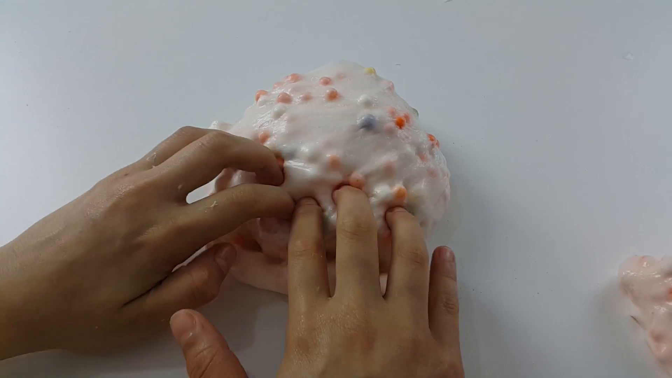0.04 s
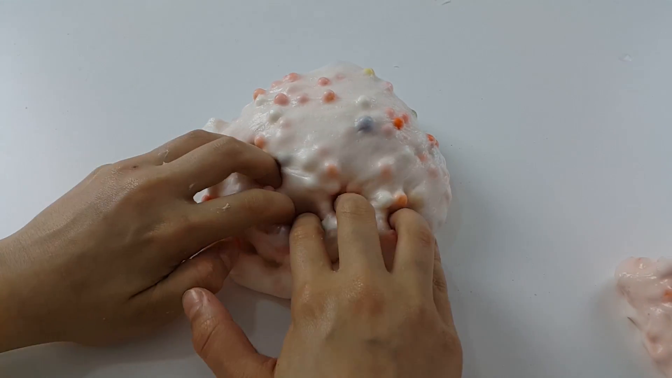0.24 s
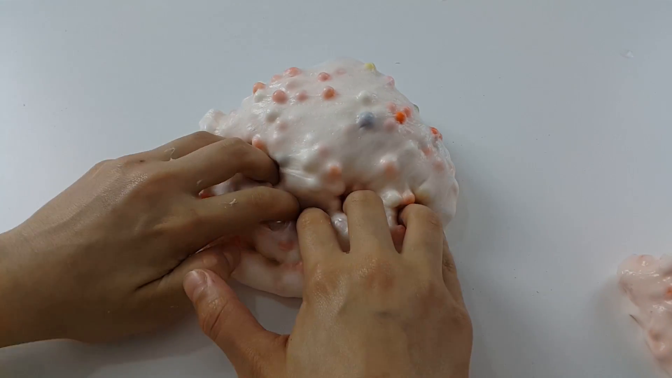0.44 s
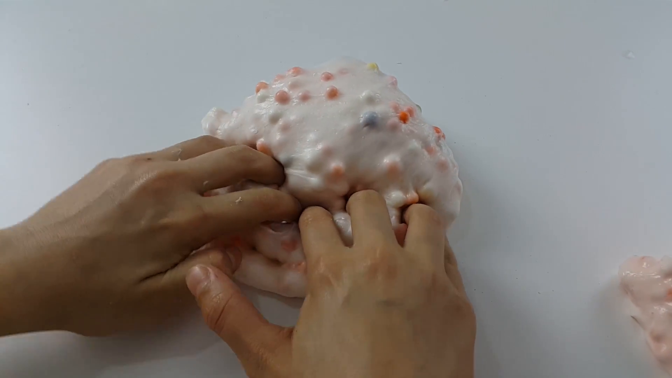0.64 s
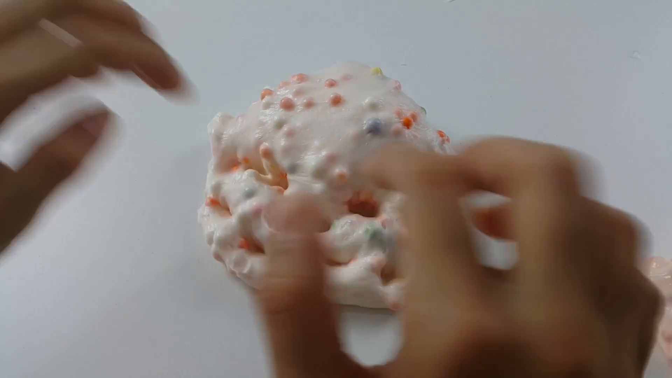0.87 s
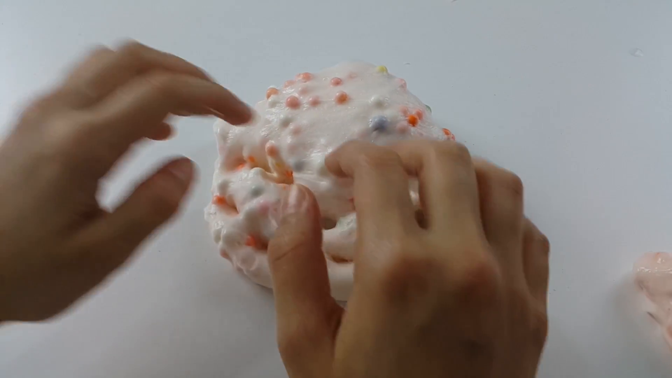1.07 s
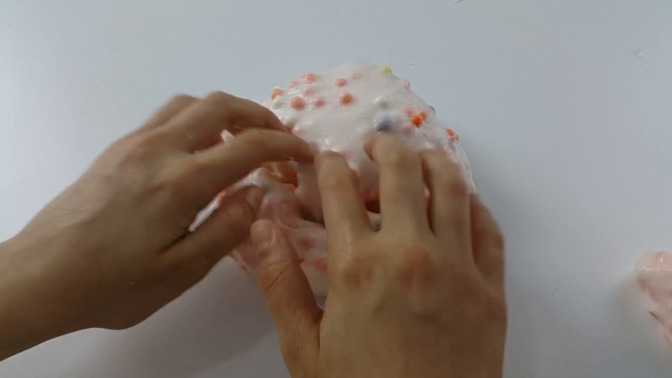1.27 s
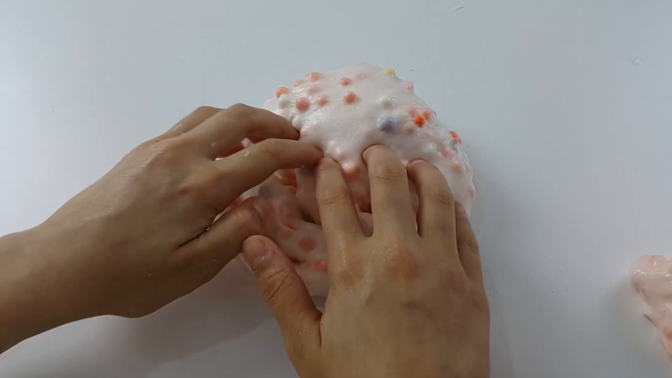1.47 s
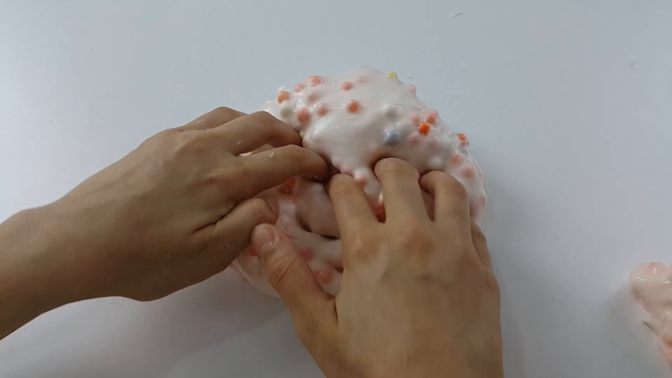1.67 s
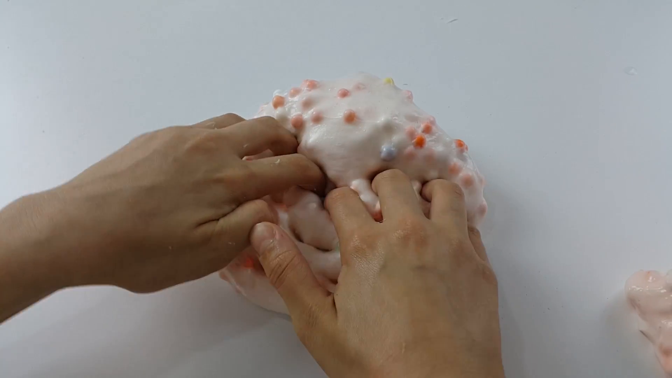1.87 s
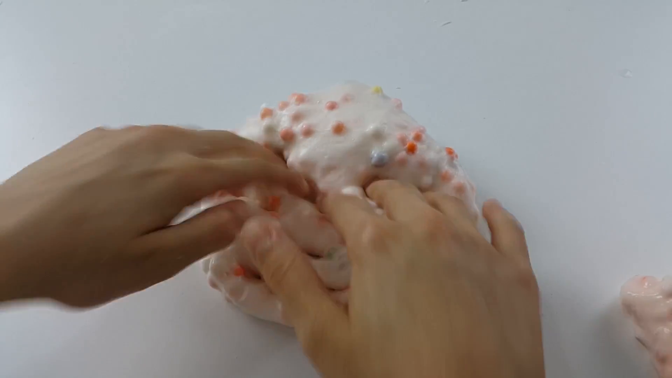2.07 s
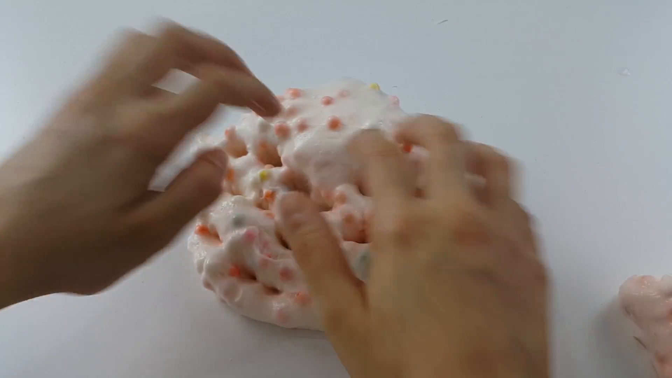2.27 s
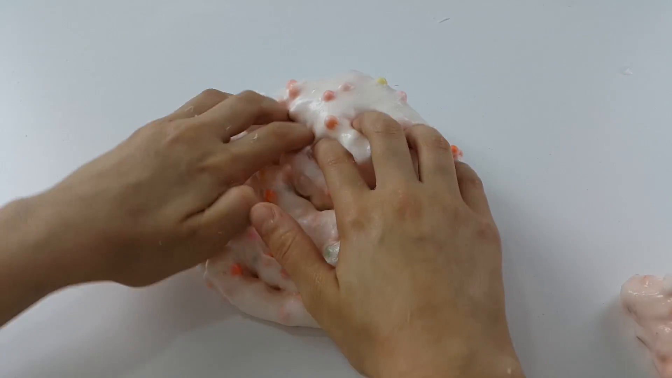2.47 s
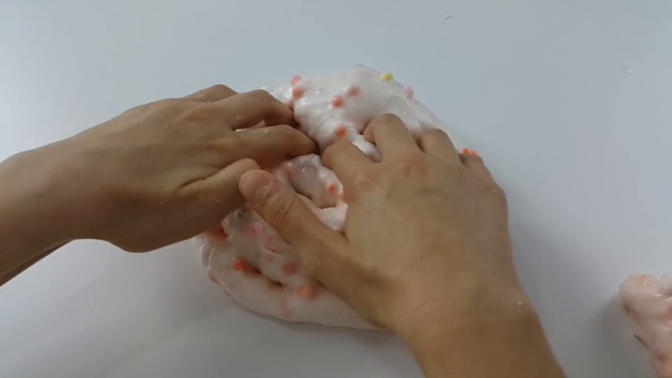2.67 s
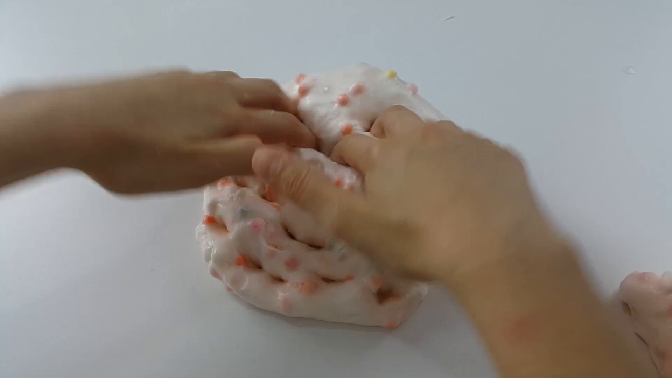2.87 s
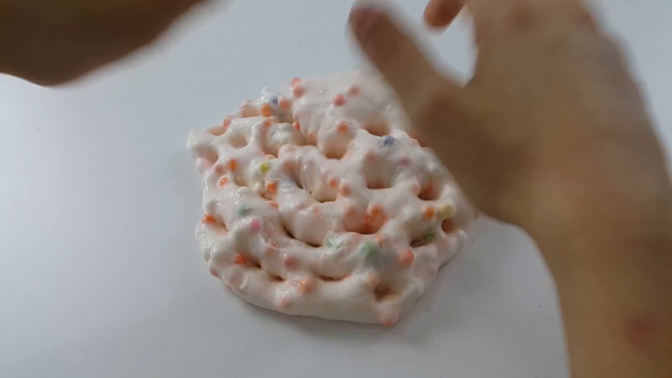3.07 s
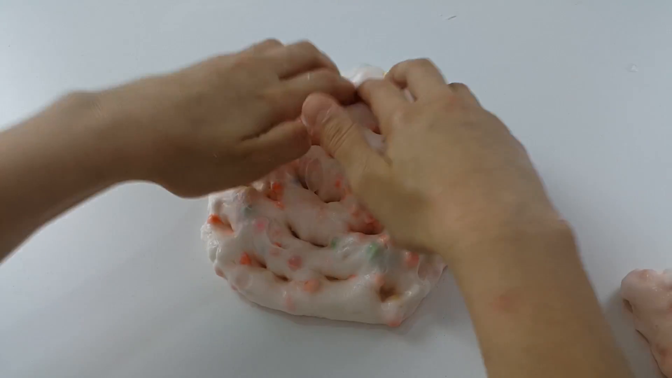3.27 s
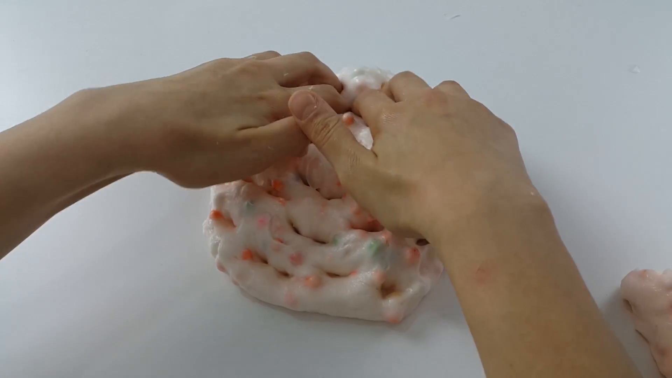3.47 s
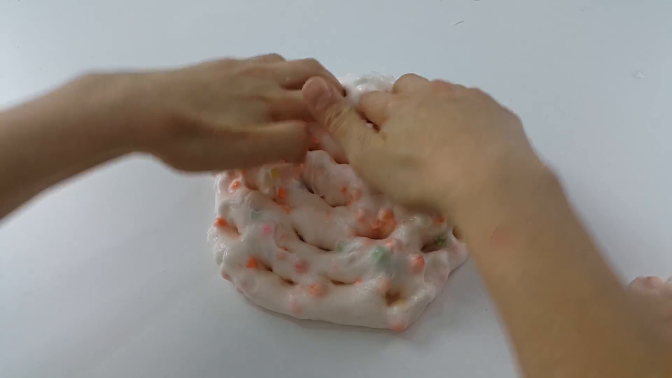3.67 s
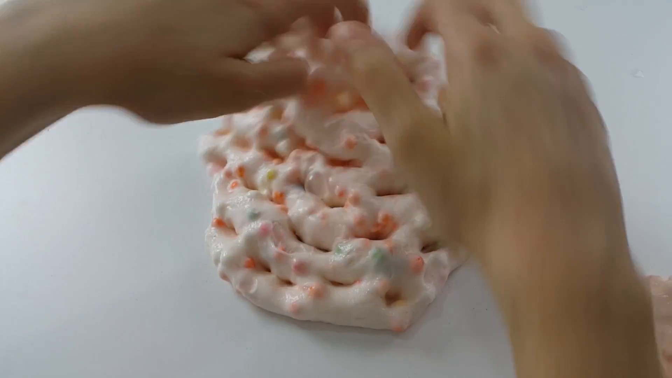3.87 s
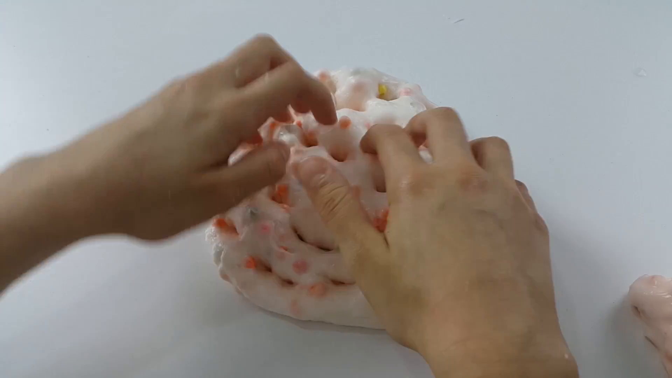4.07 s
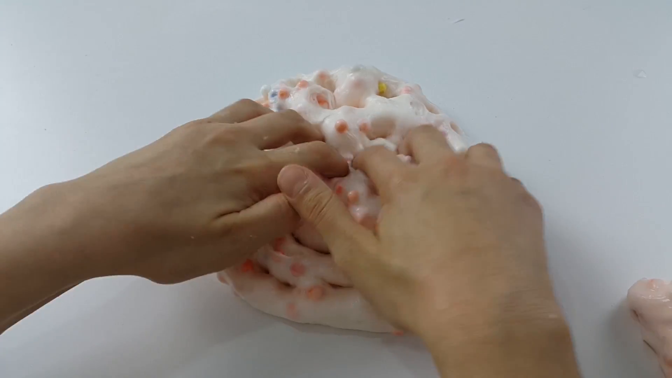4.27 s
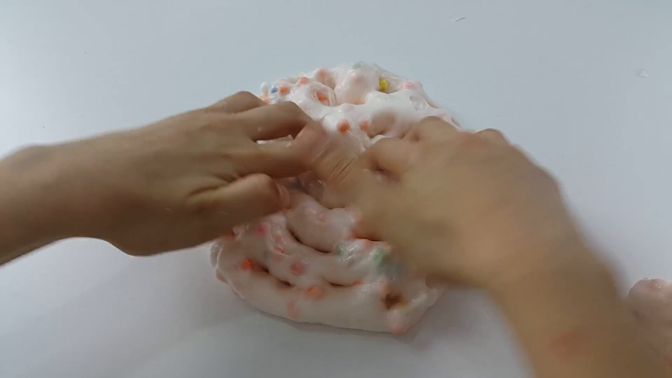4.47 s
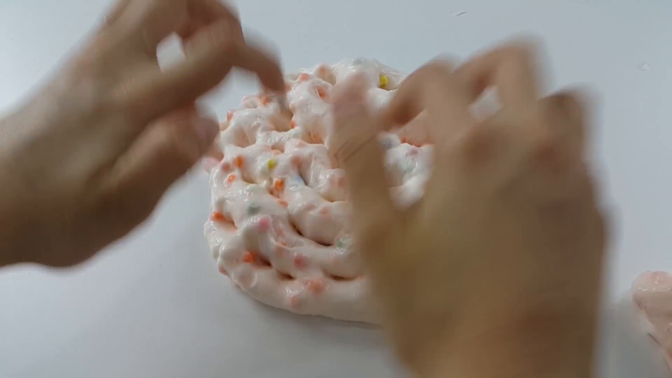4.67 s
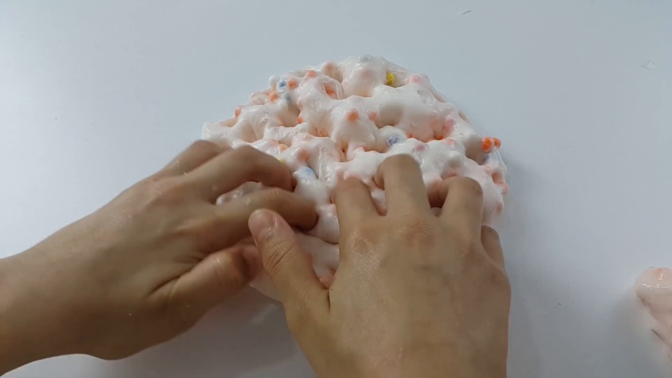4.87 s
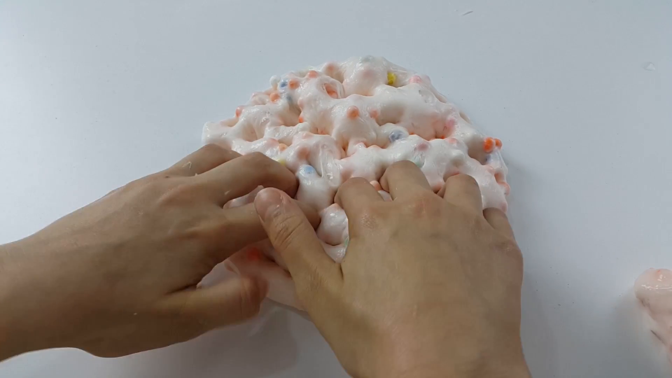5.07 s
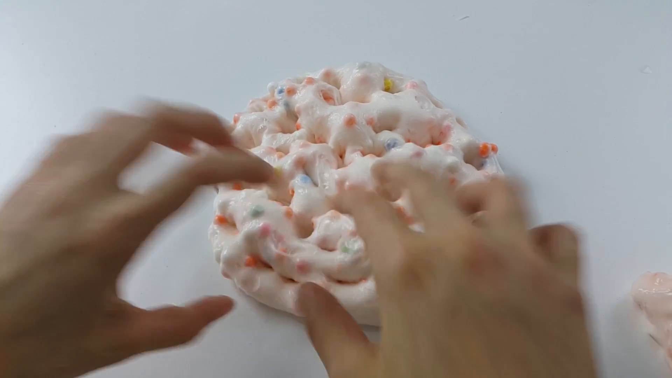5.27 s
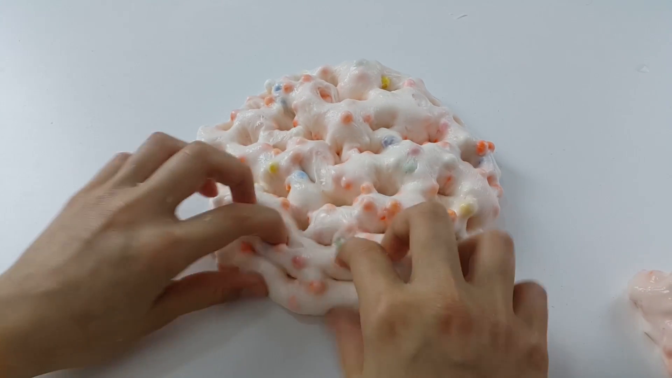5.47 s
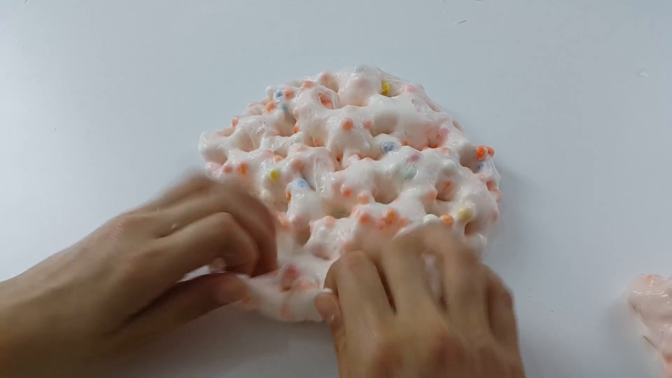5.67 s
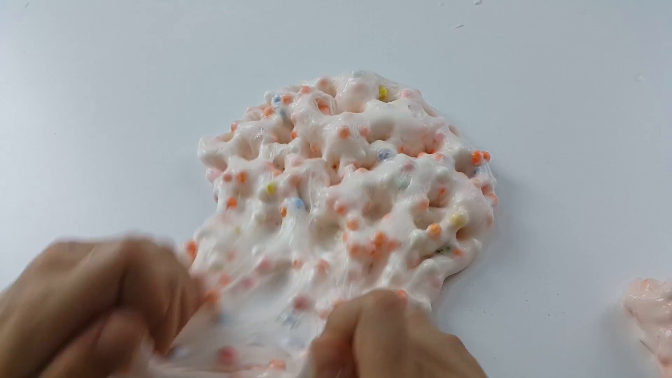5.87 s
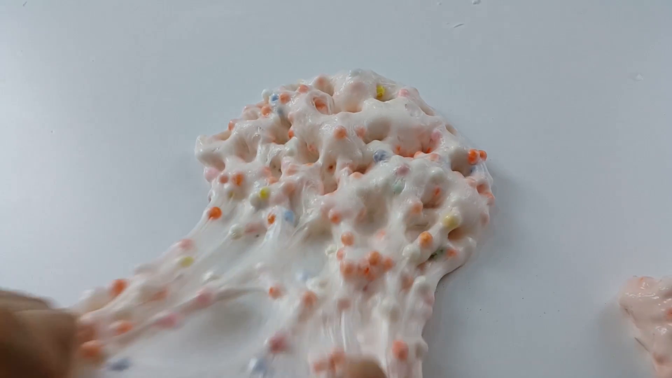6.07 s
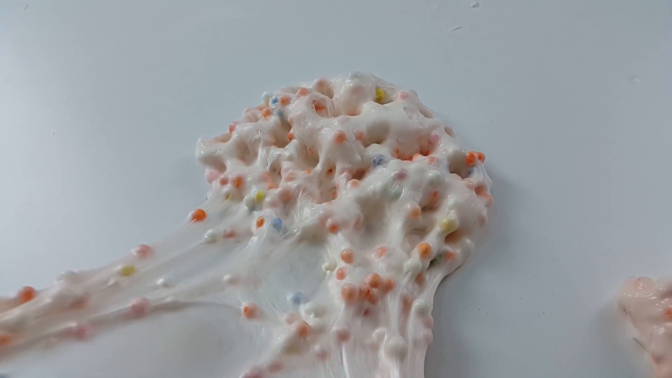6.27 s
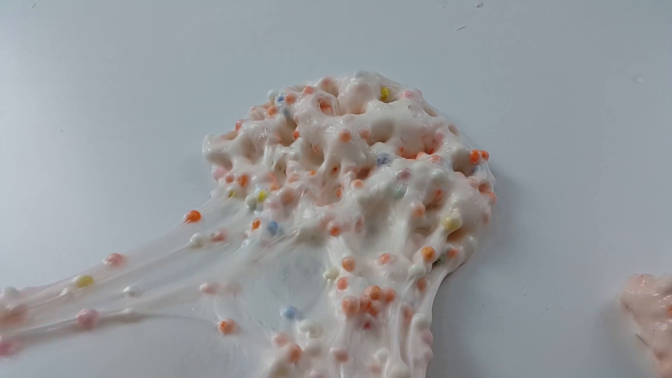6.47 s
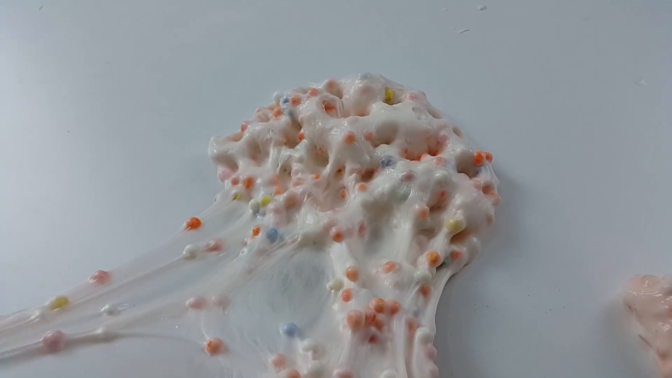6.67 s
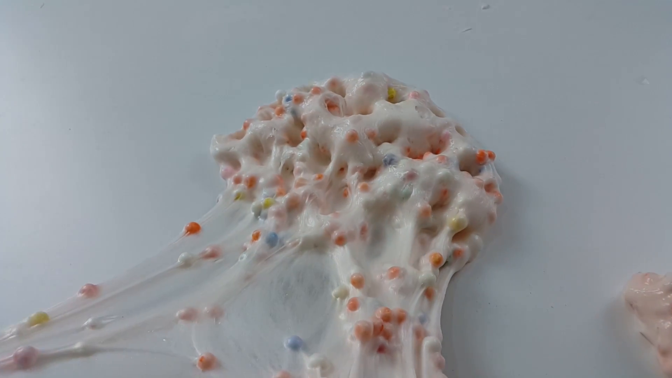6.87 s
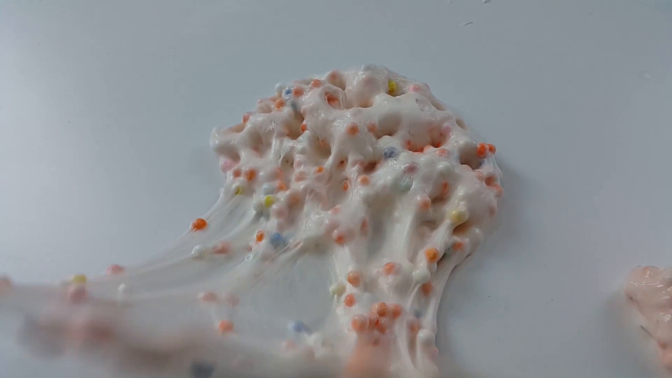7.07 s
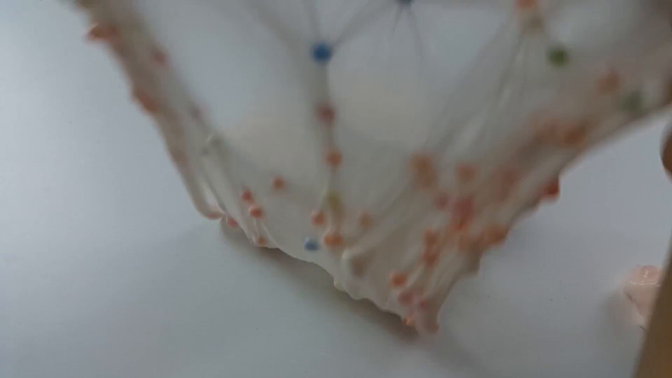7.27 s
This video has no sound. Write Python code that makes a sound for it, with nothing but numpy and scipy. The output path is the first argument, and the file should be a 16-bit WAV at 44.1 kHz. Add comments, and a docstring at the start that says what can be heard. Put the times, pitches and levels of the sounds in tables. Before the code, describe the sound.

Hands press into beaded slime on a table in a small quiet room, very close to a stereo microphone. Near-quiet pressing alternates with sudden clusters of sharp snaps, hollow plops and sticky peeling as fingers pull out. Around four seconds loud low air thumps hit the left side. Later, stretching makes a run of fine crackles that thins to faint ticks.

```python
"""A small room, a table, a lump of slime with foam beads, and a stereo microphone close by its left port.
Fingers poke in and pull out: air pockets snap (torn skin and a short ring), finger holes plop (a ringing hole),
the sticky skin peels (a rush of tears) and crackle, squelch and rumble run under the hands (random bursts).
Air pushed by the left hand buffets the left port; at the end the slime is stretched towards the microphone.
Decaying reflections give the room, and a faint noise gives its tone and the microphone's hiss."""
import sys
import numpy as np
from scipy import signal
from scipy.fft import rfft, irfft, next_fast_len
from scipy.io import wavfile
from scipy.ndimage import uniform_filter1d

SR = 44100
rng = np.random.default_rng(int(sys.argv[2]) if len(sys.argv) > 2 else 0)


def unload_wav(signal):
    """Save mono or channel-first audio to the path in sys.argv[1] as 16-bit WAV at rate SR, clipped to [-1, 1]."""
    wavfile.write(
        sys.argv[1],
        SR,
        np.round(np.clip(np.atleast_2d(signal).T, -1, 1) * 32767).astype(np.int16),
    )


N = 323253  # length in samples

# All levels below are in dB ahead of the port trims and filters; colours are relative.

# Room tone and hiss. Each row: frequency in Hz, relative density in dB per Hz.
HUSH_COLOUR = [(12, -28.5), (20, 1), (34, -12.5), (49, -21), (96, -15), (228, -14.5), (1090, -28),
               (1440, -27), (3440, -32.5), (5530, -30.5), (7520, -39), (9400, -34), (14700, -34),
               (16000, -28.5)]
HUSH_DB = -67.5
# Likeness of the two ports in the room tone. Each row: frequency in Hz, left-right likeness from 0 to 1.
HUSH_LIKENESS = [(60, 0.18), (300, 0.48), (1400, 0.057), (3100, .03)]

# Kneading hands. Each row: time in seconds, crackle in dB, low squelch in dB, table rumble in dB.
KNEADING = [(0, -79.5, -80.5, -87), (0.75, -83.5, -80.5, -81.5), (0.98, -70.5, -70, -63.5),
            (1.26, -78, -69, -80.5), (1.54, -84.5, -91.5, -92), (1.82, -76, -70.5, -76),
            (2.1, -81.5, -79.5, -85.5), (2.26, -63, -65.5, -59), (2.52, -83, -78, -83),
            (2.76, -73.5, -67.5, -71.5), (2.96, -84, -84.5, -83), (3.15, -66, -71, -67),
            (3.38, -86.5, -82.5, -90), (3.64, -76, -68, -69.5), (4.2, -71.5, -70, -69),
            (4.8, -72.5, -65.5, -74), (5.12, -84, -78, -80.5), (5.5, -73.5, -62.5, -66.5),
            (5.7, -70.5, -62, -80), (5.82, -60, -66.5, -83), (6.05, -64, -66.5, -84.5),
            (6.2, -70, -77, -84), (7.0, -81, -86.5, -88.5), (7.28, -73.5, -75, -79)]
# Colour of the crackle. Each row: frequency in Hz, relative density in dB per Hz.
CRACKLE_COLOUR = [(500, -24.5), (850, 0.5), (1300, -1.5), (1750, -7), (2600, -9), (4000, -16), (6300, -15),
                  (8000, -21.5), (16000, -26)]

# Reverberation of the small room. Each row: frequency in Hz, time to fall by 60 dB in seconds.
ROOM_T60 = [(200, 0.51), (530, 0.236), (1390, 0.2995), (3680, 0.2198), (9700, 0.23)]
# Colour of the reflections. Each row: frequency in Hz, relative level in dB.
WALL_COLOUR = [(100, -4.5), (400, -5.5), (1500, -3.5), (5000, 4.5), (9000, -3), (15000, -9.5)]

# Strongest single puffs on the left port. Each row: time in seconds, level in dB, pitch in Hz.
AIR_PUFFS = [(0.0757, -43.5, 79.6), (0.2169, -43, 86.7), (0.4354, -43, 96.6), (0.5662, -46, 89),
             (0.591, -39, 99.4), (0.9798, -34, 95), (3.976, -16.5, 200), (3.9816, -3, 425),
             (3.9847, -3.5, 169), (3.995, -11.5, 99.3), (4.0478, -6.5, 301), (4.051, -8, 484),
             (4.056, -8.5, 219.4), (4.075, -7, 133.2), (4.1573, -10.5, 151), (4.1881, -10.5, 229),
             (4.2074, -8, 381.7), (4.2133, -6, 126.5), (4.2152, -17, 700), (4.222, -13, 160.6),
             (4.232, -11, 231), (4.2487, -12.5, 134), (4.274, -18.5, 119.6), (4.6878, -10, 172.2)]
# Turbulent air, a row a sweep of the hand. Each row: start, rise and fall in seconds, top level in dB.
AIR_GUSTS = [(3.962, 0.0175, 0.0775, -20), (4.04, 0.021, 0.081, -20), (4.118, 0.0333, 0.0697, -25),
             (4.18, 0.0303, 0.1465, -23), (4.67, 0.0125, 0.0636, -29.5), (5.54, 0.049, 0.224, -44.5)]
# Colour of the large eddies. Each row: frequency in Hz, relative density in dB per Hz.
EDDY_COLOUR = [(15, -64.5), (25, -35), (86, 2.5), (236, -8), (275, -6), (362, -9.5), (637, -18), (743, -25),
               (1500, -45.5), (1950, -79.5), (3300, -120)]
GUST_START_DB, GUST_END_DB = -7.5, -24  # under the top

# Clearest bursting air pockets. Each row: time in seconds, level in dB, pocket pitch in Hz,
# level of the spit of tearing skin in dB over that of the pocket.
POCKET_SNAPS = [(0.3134, -44, 6540, -2.5), (0.4111, -48, 6630, 0.5), (0.538, -50.5, 1040, -18),
                (0.5815, -37, 5600, -10), (0.6605, -48.5, 10500, -5.5), (0.8659, -25.5, 1417, -0.5),
                (0.8719, -25.5, 1470, -14.5), (0.8844, -21.5, 4466, -9), (1.2736, -53, 5410, -1),
                (1.7702, -49.5, 1410, -7), (1.8723, -41, 6540, -9), (1.8894, -48.5, 6800, -1),
                (1.9711, -54, 3200, -4.5), (1.9833, -46, 1620, -15), (2.1898, -26, 3486, -7),
                (2.2079, -21, 6790, -3.5), (2.2223, -31, 1230, -4.5), (2.2277, -25, 5620, 0),
                (2.2323, -26.5, 1745, -12.5), (2.5757, -57, 4220, 3), (2.6884, -42, 2920, 1),
                (2.8214, -46.5, 1260, -14), (3.0412, -32, 6750, 1.5), (3.051, -29, 1825, -6),
                (3.0637, -28.5, 1750, -20.5), (3.071, -24, 4740, -5.5), (3.0842, -24, 1053, -2.5),
                (3.1863, -27.5, 1026, -12.5), (3.4292, -53, 1550, -18.5), (3.6056, -42, 4070, 3.5),
                (3.61, -40.5, 6500, -4), (3.8922, -44, 1720, -11.5), (3.9117, -31.5, 1780, -6),
                (3.9227, -27.5, 1650, -9), (3.935, -31.5, 1317, -12.5), (3.9412, -31.5, 1210, 3),
                (4.1225, -39, 1264, -26), (4.1402, -27.5, 1466, -31.5), (4.419, -47, 4360, -5),
                (4.4458, -50, 4080, 9.5), (4.5873, -49, 1180, -19), (4.6402, -42.5, 3950, -9.5),
                (4.6653, -36, 1495, 2), (4.6838, -27, 1520, -10.5), (4.6901, -28, 5630, -0.5),
                (4.7203, -21, 6365, -1), (4.9415, -38.5, 5690, -7), (5.0435, -51.5, 5330, 2.5),
                (5.1642, -47, 1367, -34), (5.2464, -45.5, 6600, -16.5), (5.3128, -44, 1176, -8),
                (5.3469, -33, 6800, -1), (5.3686, -24, 6430, -9.5), (5.375, -32.5, 1087, 3),
                (5.5582, -35, 2866, -21.5), (5.5885, -37.5, 1674, -20), (5.7451, -44.5, 6770, -4.5),
                (5.779, -43.5, 1508, -12), (5.8259, -39, 1311, -6), (5.8439, -33.5, 1574, -2.5),
                (5.9022, -40.5, 6130, 0.5), (5.9286, -32, 1434, 1), (5.9461, -35.5, 6810, -7.5),
                (5.9888, -38.5, 1315, -21), (6.042, -38, 1430, -21), (6.0607, -41, 3750, -2.5),
                (6.0845, -43.5, 1470, -10), (6.1461, -46, 1680, -0.5), (6.1837, -47, 1138, -2.5),
                (6.2801, -54.5, 3783, -6), (6.3136, -53.5, 6460, -7.5), (6.394, -53.5, 6000, 0),
                (6.6295, -51, 3170, -4.5)]
# Colour of the tearing skin. Each row: frequency in Hz, relative density in dB per Hz.
SPIT_COLOUR = [(1500, -4), (3500, -0.5), (6500, -3), (9000, -6), (12000, -3), (16000, -16)]
SMALL_OVER_PEEL_DB, SMALL_SPREAD_DB, SMALL_SPIT_DB = 6, 12, -8.5  # small pockets: top over the peel, range, spit
LOW_HZ, HIGH_HZ, HIGH_SHARE = (1050, 1790), (3802, 7000), .3  # two sizes of small pocket
PARTING_START_S, PARTING_LENGTH_S, PARTING_TOP_DB = 5.75, .4, -42  # strands of slime parting
STRAY_TOP_DB = -51  # lone faint pockets, at any time
STRETCH_S = 5.7  # from here the hands draw the slime towards the microphone

# Fingers peeling off the skin. Each row: start in seconds, level in dB, rise in seconds, fall by 60 dB in seconds.
SKIN_PEELS = [(.535, -64.5, 0.0037, 0.0034), (.864, -40, .004, 0.0933), (1.27, -58.5, 0.00609, 0.1943),
              (1.975, -59, 0.00985, 0.07), (2.165, -41, 0.0611, 0.2394), (2.69, -64.5, 0.00413, 0.22),
              (2.81, -61.5, .012, 0.1247), (3.038, -35.5, 0.03454, 0.32), (3.17, -49, .02, 0.1222),
              (3.895, -40.5, 0.03457, 0.326), (4.118, -47.5, 0.0253, 0.2073), (4.42, -59, .03, 0.06),
              (4.66, -42, 0.0399, 0.2656), (5.16, -62.5, .006, 0.01), (5.34, -43.5, 0.02987, 0.1584),
              (5.553, -51, 0.00992, 0.4), (7.05, -65, 0.129, 0.65)]
# Colour of the peeling. Each row: frequency in Hz, relative density in dB per Hz.
SKIN_COLOUR = [(88, -45), (150, -12), (368, -3), (475, -3.5), (649, -11), (960, -9), (1170, -11),
               (6640, -23.5), (12700, -35.5), (16000, -36.5)]

# Clearest finger holes letting go. Each row: time in seconds, level in dB, hole pitch in Hz.
HOLE_PLOPS = [(0.538, -52, 523), (0.8657, -32, 571), (0.8763, -32.5, 505), (0.8915, -27.5, 505),
              (1.9841, -40, 479), (2.1716, -44.5, 400), (2.1967, -39.5, 410), (2.2095, -22.5, 386.6),
              (2.2237, -29.5, 555), (2.7427, -43, 378), (2.8224, -48, 505), (3.0073, -51, 526),
              (3.0529, -34, 497), (3.0688, -34, 458), (3.086, -16.5, 441.5), (3.1861, -37, 395),
              (3.9128, -31, 857), (3.9377, -28.5, 405), (4.1284, -38, 946), (4.454, -37.5, 452),
              (4.5932, -50, 406), (4.6673, -39, 393), (4.6989, -29, 363.3), (5.1679, -45, 453),
              (5.3127, -51, 420), (5.3523, -37.5, 396), (5.3683, -29.5, 498), (5.555, -34.5, 384),
              (5.59, -34.5, 445), (5.8259, -47.5, 563), (6.4441, -47, 667)]

EDGE_HZ = 15800  # upper band limit


def gain_of(db):
    """Amplitude factor of a level in dB."""
    return 10 ** (np.asarray(db) / 20)


def evened(x):
    """Scales x to rms 1."""
    return x / np.sqrt(np.mean(x ** 2) + 1e-20)


def read(points, hz):
    """Reads a table over frequency, straight lines on a log axis."""
    f, value = np.transpose(points)
    return np.interp(np.log(hz + 1), np.log(f + 1), value)


def add(mix, s, sound):
    """Lays a sound into the mix at s seconds."""
    part = mix[..., max(round(s * SR), 0):][..., :sound.shape[-1]]
    part += sound[..., :part.shape[-1]]


def coloured(x, spectrum):
    """Filters x by the spectrum, then scales it to rms 1."""
    size = next_fast_len(x.shape[-1])
    gain = gain_of(read(spectrum, np.fft.rfftfreq(size, 1 / SR)))
    return evened(irfft(rfft(x, size) * gain, size)[..., :x.shape[-1]])


def ring(hz, cycles, rise):
    """A short swing of trapped air: swells over `rise` cycles, dies in `cycles`; peak near 1."""
    turns = np.arange(int(7 * (abs(cycles) + abs(rise)) * SR / hz) + 8) * hz / SR
    shape = (1 - np.exp(-turns / abs(rise))) ** 2 * np.exp(-turns / abs(cycles))
    return shape / shape.max() * np.sin(2 * np.pi * turns)


def hush():
    """Room tone and microphone hiss: noise with a patchy level, partly shared by the ports, most in the bass."""
    hz = np.fft.rfftfreq(1024, 1 / SR)
    a, b, c, d, patches = rng.standard_normal((N // 256 + 5, 513, 5)).T
    patches = uniform_filter1d(patches, size=10, axis=0)  # over frequency
    patches = evened(uniform_filter1d(patches, size=12, axis=1))  # over time
    likeness = np.clip(read(HUSH_LIKENESS, hz), -1, 1)[:, None]
    left = a + 1j * b
    right = likeness * left + np.sqrt(1 - likeness ** 2) * (c + 1j * d)
    spectra = np.array([left, right]) * gain_of(read(HUSH_COLOUR, hz)[:, None] + 0.85 * patches)
    noise = evened(signal.istft(spectra, nperseg=1024, noverlap=768)[1][:, :N])
    return gain_of(HUSH_DB + np.array([[3.5], [1.5]])) * noise


def kneading():
    """Many tiny pockets burst at random, a few large; wet mass squelches and shakes the table."""
    s, *columns = np.transpose(KNEADING)
    crackle_db, squelch_db, rumble_db = (np.interp(np.arange(N) / SR, s, c) for c in columns)
    chance = rng.random((3, N))
    size_db = [[3.5], [3.5], [2.5]] * np.minimum(rng.exponential(1, (3, N)), 3)
    happens = chance < np.array([[900], [900], [400]]) / SR  # mean bursts per second
    bursts = rng.standard_normal((3, N)) * gain_of(size_db) * happens
    spread = bursts[:2] + 0.344 * bursts[1::-1]  # each port also hears some of the other side
    crackle = gain_of(crackle_db) * coloured(spread, CRACKLE_COLOUR)
    wet = signal.oaconvolve(bursts[2], ring(319.7, cycles=0.2, rise=0.62))[:N]
    squelch = gain_of(squelch_db) * evened(wet)
    shaking = signal.oaconvolve(rng.standard_normal(N), ring(94.7, cycles=1.8, rise=0.75))[:N]
    rumble = gain_of(rumble_db) * evened(shaking)
    return crackle + squelch + rumble * gain_of([[2.5], [-3]])


def room(x):
    """Decaying reflections, shared in the bass; three tails take turns so that pops echo differently."""
    out, turn = np.zeros((2, N)), np.arange(N) / SR * 9.0
    for k in range(3):
        taps = rng.standard_normal((2, SR // 2)) * (rng.random((2, SR // 2)) < .12)
        taps[:, :200] = 0  # the walls answer after some milliseconds
        hz, t, z = signal.stft(taps, SR, nperseg=256)
        shared = np.clip(read([(300, 0.912), (700, 0.5), (1500, 0.07)], hz), 0, 1)[:, None]
        z[1] = shared * z[0] + np.sqrt(1 - shared ** 2) * z[1]
        decay_db = -60 * t / read(ROOM_T60, hz)[:, None]
        z *= gain_of(read(WALL_COLOUR, hz)[:, None] + decay_db)
        tail = signal.istft(z, SR, nperseg=256)[1]
        tail = tail / np.linalg.norm(tail[0])
        window = np.sqrt(2 / 3) * np.cos(np.pi * (turn + k / 3))  # the three powers sum to 1
        out += signal.fftconvolve((x * window)[None], tail, axes=1)[:, :N]
    return out


def buffeting():
    """Lumpy low pressure swings, almost only on the left port; faster air makes sharper eddies."""
    out = np.zeros(N)
    for s, db, hz in AIR_PUFFS:
        add(out, s - 0.8104 / hz, gain_of(db - 1.5) * ring(hz, cycles=0.518, rise=0.28))
    for start, rise, fall, top_db in AIR_GUSTS:
        s = start + np.array([0, rise, fall])
        s[2] = start + fall  # the fall ends this long after the start
        db = top_db + np.array([GUST_START_DB, 0, GUST_END_DB])
        t = np.arange(s[0], s[-1], 1 / SR)
        swell_db = np.interp(t, s, db)
        lumps = evened(uniform_filter1d(rng.standard_normal(len(t)), size=300))
        eddies = coloured(rng.standard_normal(len(t)), EDDY_COLOUR)
        sharp = evened(np.gradient(eddies)) * gain_of(0.83 * (swell_db + 20.5) - 8.0)
        gust = gain_of(swell_db + 3.4 * lumps) * (eddies + sharp)
        add(out, s[0], gust * signal.windows.tukey(len(t), .15))
    smooth = signal.butter(2, 1300, fs=SR, output="sos")  # moving air carries little treble
    out = signal.sosfilt(smooth, signal.sosfilt(smooth, out))
    return np.array([out, gain_of(-46) * out])


def small_pockets(count):
    """Draws moments from 0 to 1, levels in dB under the top, and pitches in Hz from two sizes of pocket."""
    when, size, kind, pitch = rng.random((count, 4)).T
    high_range, low_range = np.array([HIGH_HZ, LOW_HZ])[:, :, None]
    low, high = np.where(kind < HIGH_SHARE, high_range, low_range)
    return when, -SMALL_SPREAD_DB * size, low * (high / low) ** pitch


def small_snaps():
    """Small pockets at random: a few in every peel, a dense run while strands part, lone ones anywhere."""
    rows = []
    for s, db, rise, t60 in SKIN_PEELS:
        when, size_db, hz = small_pockets(count=6)
        rows += zip(s + when * (rise + .15 * t60), db + SMALL_OVER_PEEL_DB + size_db, hz)
    when, size_db, hz = small_pockets(count=95)
    swell_db = -30 * (when - .4) ** 2
    rows += zip(PARTING_START_S + PARTING_LENGTH_S * when, PARTING_TOP_DB + size_db + swell_db, hz)
    when, size_db, hz = small_pockets(count=45)
    rows += zip(when * N / SR, STRAY_TOP_DB + size_db, hz)
    return [(*row, SMALL_SPIT_DB) for row in rows]


def scattered(sound, draws):
    """Table, lump and hands throw a few echoes within milliseconds, other ones to each port."""
    taps = np.zeros((2, 160))
    lags, sizes = draws.reshape(2, 2, -1)
    places = (10 + 140 * lags ** 2).astype(int)
    np.put_along_axis(taps, places, .45 * (2 * sizes - 1) * np.exp(-lags), 1)
    right_delay = int(1 + 6 * lags[0, 0])  # samples; the right port is further, by where the pop sits
    taps[[0, 1], [0, right_delay]] = gain_of(3), 1
    return signal.fftconvolve(sound[None], taps, axes=1)


def snaps():
    """The skin tears with a bright spit as the pocket rings briefly: the near sound, and what leaves for the walls."""
    near, away, t = np.zeros((2, N)), np.zeros(N), np.arange(256) / SR
    rows = POCKET_SNAPS + small_snaps()
    tears, echoes = rng.standard_normal((len(rows), 256)), rng.random((len(rows), 16))
    for (s, db, hz, spit_db), tear, echo in zip(rows, tears, echoes):
        pop = gain_of(spit_db) * coloured(tear, SPIT_COLOUR) * np.exp(-t / 0.000417)
        add(pop, 0, ring(hz, cycles=0.454 + hz / 3500, rise=0.1))
        add(near, s - .0005, gain_of(db + 1.0) * scattered(pop, echo))
        beam_db = 2.2 * np.log2(hz / 1500)  # high pockets beam upwards, less reaches the walls
        closer_db = 3.1 * (s > STRETCH_S)  # closer pops sound drier
        add(away, s, gain_of(db - beam_db - closer_db) * pop)
    return near, away


def peeling():
    """Sticky skin lets go in dense uneven tears, partly shared between the ports."""
    out = np.zeros((2, N))
    for s, db, rise, t60 in SKIN_PEELS:
        t = np.arange(int((rise + t60) * SR)) / SR
        size = gain_of(3.96 * np.minimum(rng.exponential(1, len(t)), 4))
        happens = rng.random(len(t)) < 2500 / SR  # mean tears per second
        tears = rng.standard_normal((3, len(t))) * size * happens
        swell = np.minimum(t / rise, 1) * gain_of(db - 60 * np.maximum(t - rise, 0) / t60)
        add(out, s, coloured(tears[:2] + 0.84 * tears[2], SKIN_COLOUR) * swell)
    return out


def plops():
    """A hole the size of a fingertip rings like a bottle for a cycle or two."""
    out = np.zeros(N)
    for s, db, hz in HOLE_PLOPS:
        add(out, s - 0.7445 / hz, gain_of(db + 2.0) * ring(hz, cycles=0.888, rise=0.192))
    return out * gain_of([[1.5], [-.2]])


def scene():
    """Sums the near sounds, their reflections, the air on the left port and the room tone."""
    near, away = snaps()
    mass = plops() + peeling() + kneading()
    walls = room(gain_of(-3.0) * away + gain_of(-2.5) * mass[1])
    return near + mass + walls + buffeting() + hush()


def record(dry):
    """The microphone rolls off the deep bass steeply; then a small steady offset and the band limit."""
    bass_cut = signal.butter(2, 48, "highpass", fs=SR, output="sos")
    thin = signal.sosfilt(bass_cut, signal.sosfilt(bass_cut, dry))
    band_limit = signal.firwin(511, EDGE_HZ, window=("kaiser", 9), fs=SR)
    return signal.oaconvolve(thin - .0005, band_limit[None], "same")


dry = scene()
out = record(dry)
unload_wav(out)
```